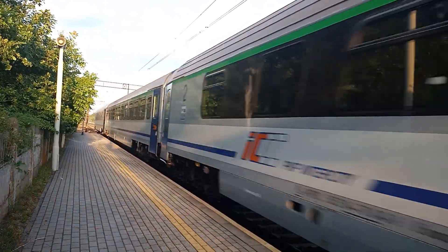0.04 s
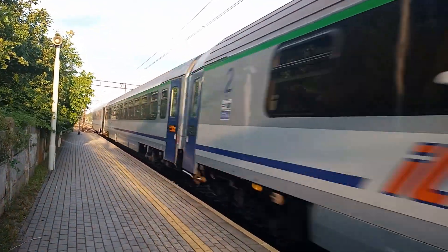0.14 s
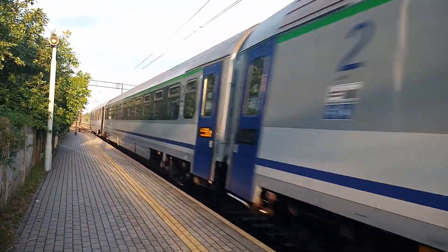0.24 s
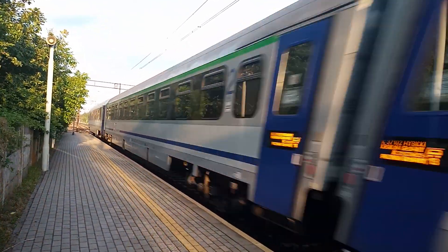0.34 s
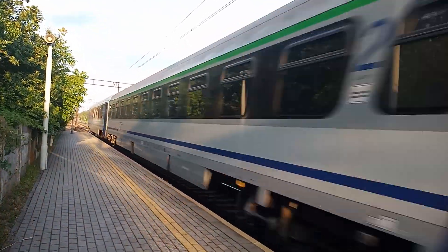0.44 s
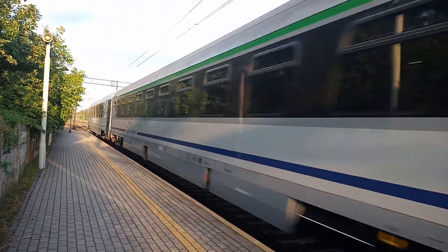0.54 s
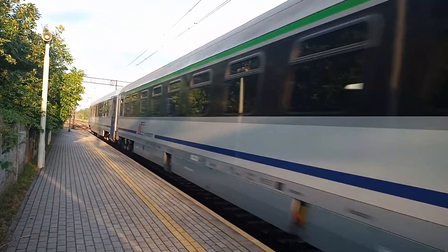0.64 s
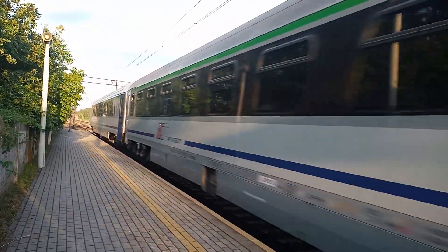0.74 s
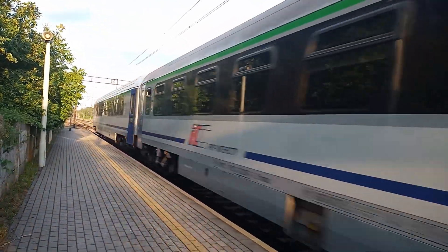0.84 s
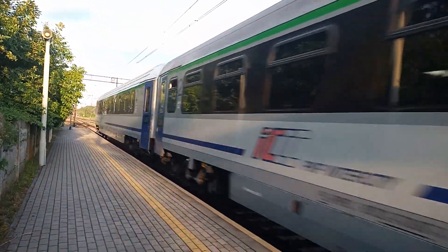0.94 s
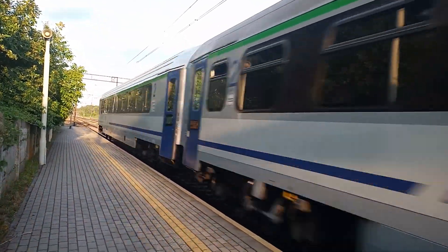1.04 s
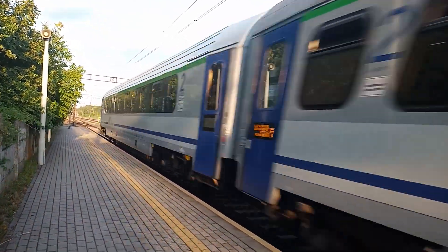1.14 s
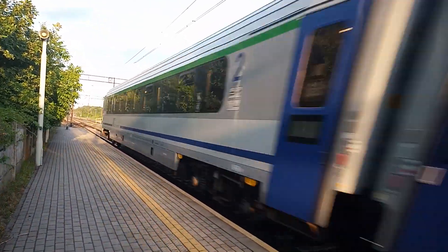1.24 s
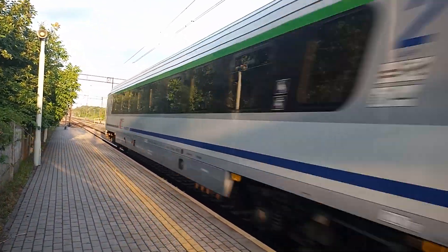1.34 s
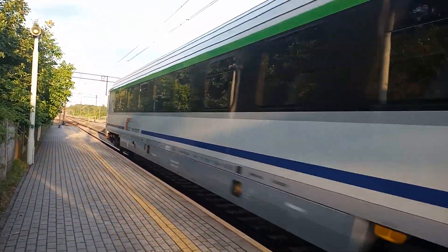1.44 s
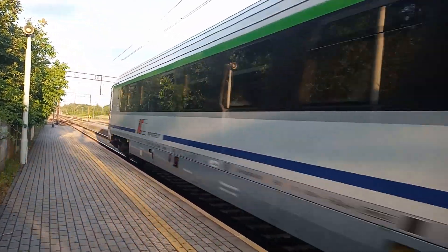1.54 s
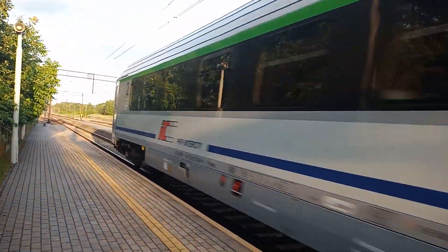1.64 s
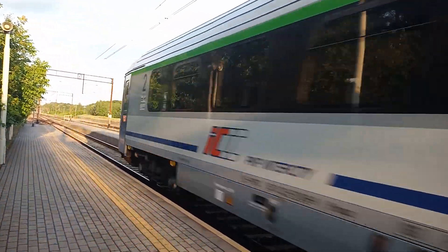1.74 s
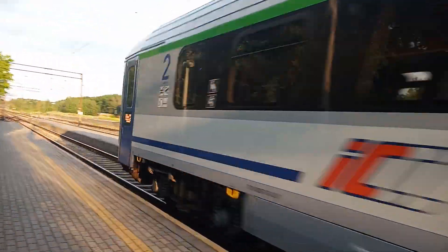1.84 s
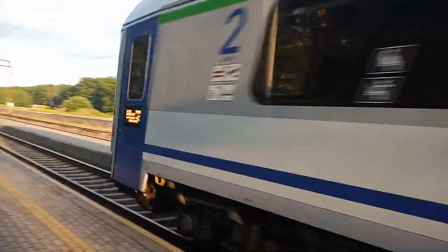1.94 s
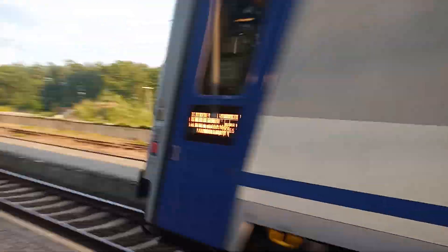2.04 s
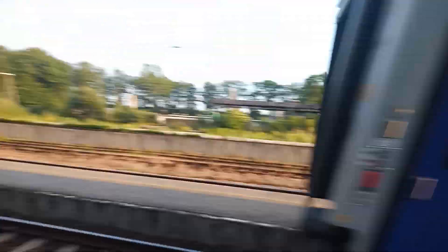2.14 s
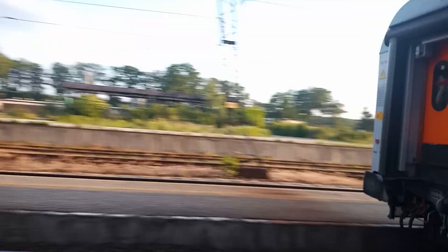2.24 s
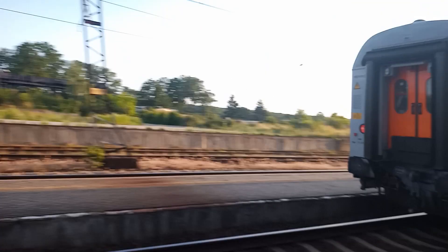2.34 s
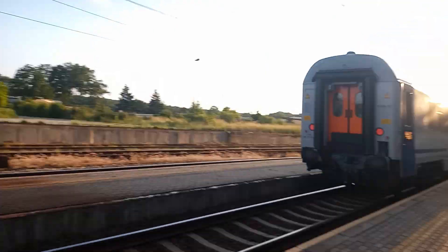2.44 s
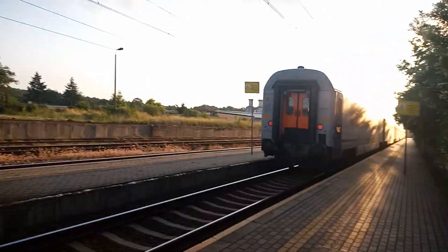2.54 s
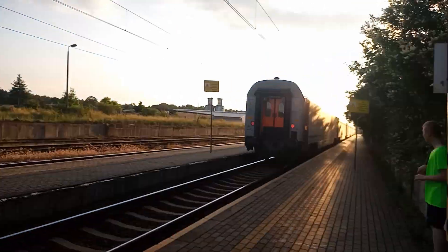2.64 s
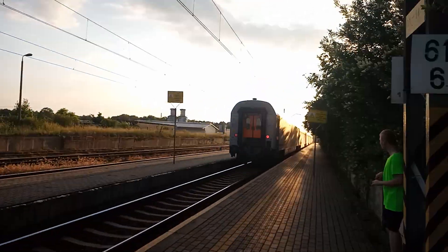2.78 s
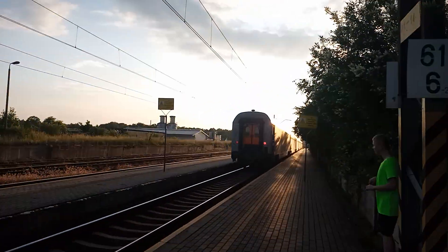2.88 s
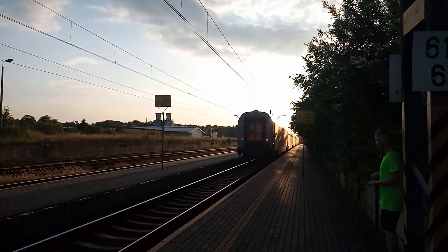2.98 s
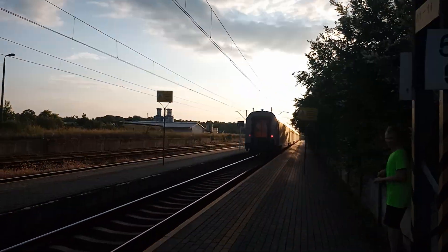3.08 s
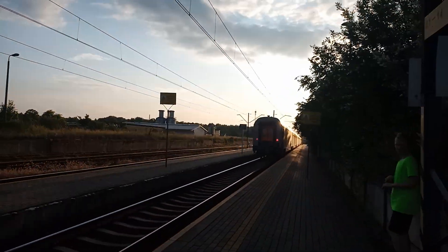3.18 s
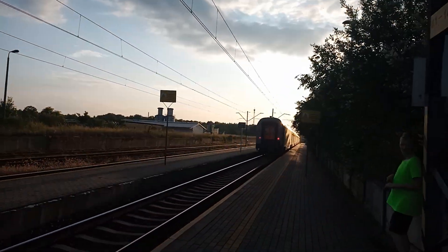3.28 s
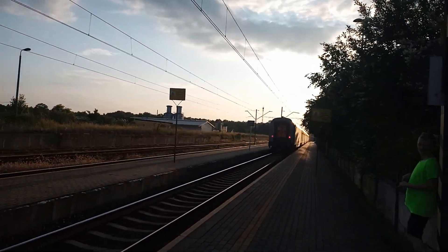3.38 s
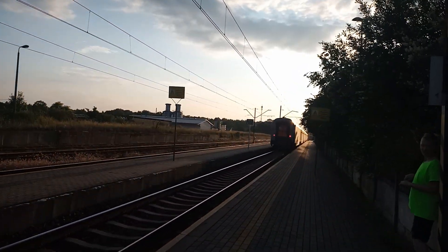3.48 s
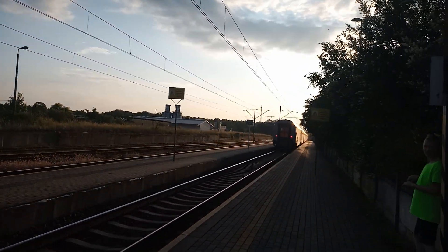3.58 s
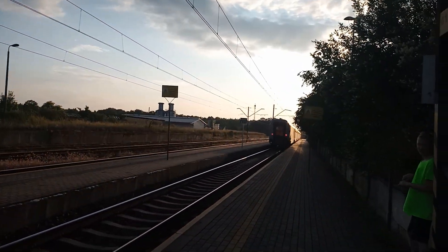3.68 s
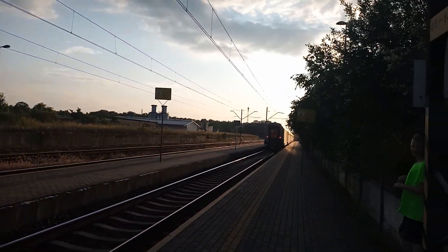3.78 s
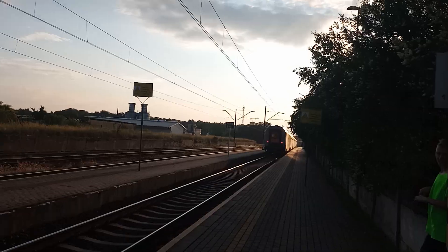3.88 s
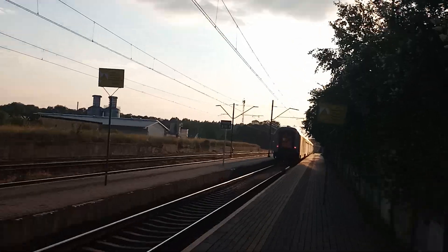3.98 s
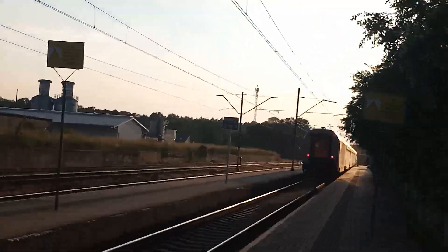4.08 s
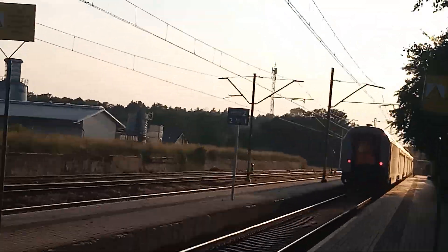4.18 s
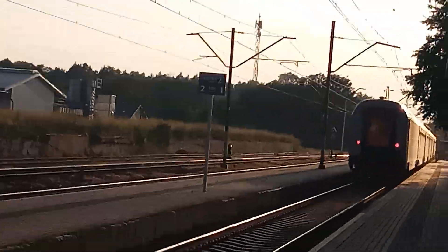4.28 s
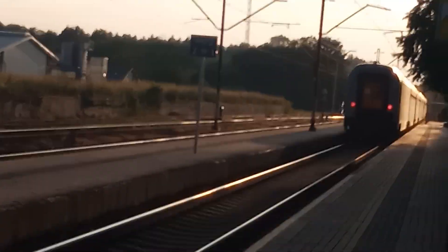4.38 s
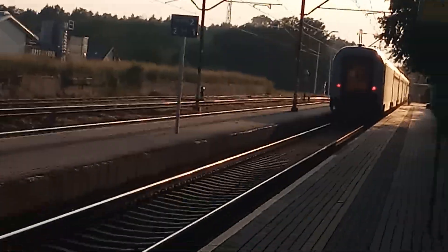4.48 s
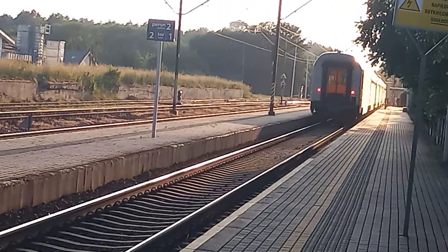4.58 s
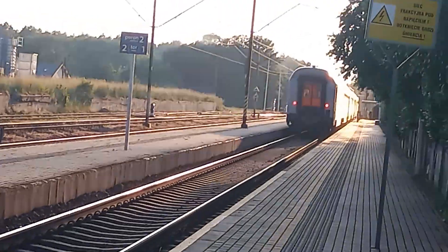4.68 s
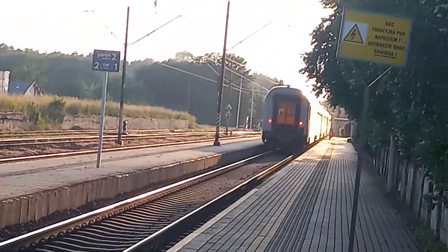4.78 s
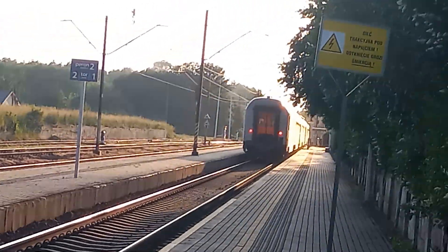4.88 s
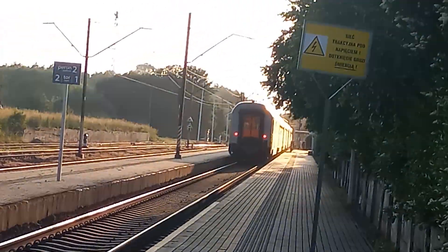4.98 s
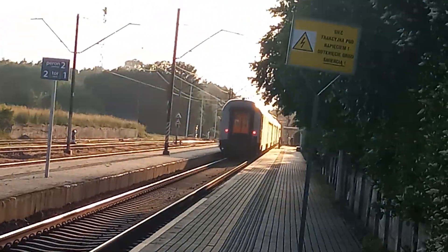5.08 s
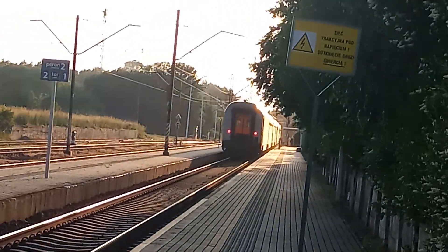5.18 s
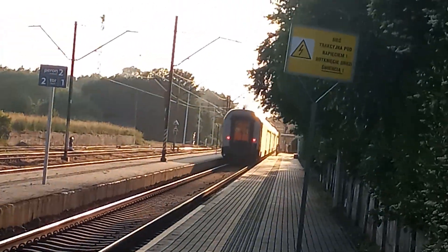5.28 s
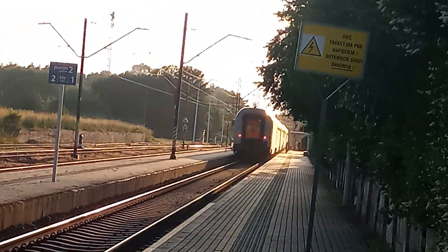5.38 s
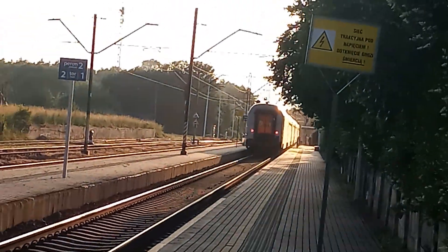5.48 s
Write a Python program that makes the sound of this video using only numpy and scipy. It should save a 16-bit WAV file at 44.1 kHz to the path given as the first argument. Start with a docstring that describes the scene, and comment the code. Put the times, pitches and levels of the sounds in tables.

```python
"""An express train rushes past

The last coaches of an electric train pass a phone on a platform and run away down the line.
Rough steel makes the rails roar and the wheels ring. Each bogie (a frame with two axles) drops in
pitch as it goes by, and a coach's fan hums past. The nearest bogies overload the microphone.
Then the rails sing, and the swirling air behind the train buffets the microphone."""
import sys
import numpy as np
from scipy import signal
from scipy.fft import rfft, irfft, next_fast_len
from scipy.io import wavfile
from scipy.ndimage import uniform_filter1d, map_coordinates

SR = 44100
rng = np.random.default_rng(int(sys.argv[2]) if len(sys.argv) > 2 else 0)


def to_wav(sig):
    """Store sig (one row per channel, or 1-D mono) as 16-bit WAV at the path in sys.argv[1].

    Samples outside -1..1 are clipped; the rate is SR.
    """
    pcm = np.clip(np.atleast_2d(sig), -1, 1) * 32767
    pcm = np.round(pcm).astype(np.int16)
    wavfile.write(sys.argv[1], SR, pcm.T)  # frames by channels


N = 243431
T = np.arange(N) / SR
SPEED_M_S, SOUND_M_S = 25, 343
TRACK_DISTANCE_M, AXLE_GAP_M = 3.6, 2.5
LOUDEST_LAG_S = 0.013  # a bogie is loudest just after it passes
FAR_STEEL_S = 1.53  # how slowly the distant ring and hiss take over

# The passing bogies. Each row: passing time in seconds, ring level in dB, how steeply the ring fades
# with distance, roar level in dB, hiss level in dB, squeal in dB compared with one axle's ring.
BOGIES = [(-.13, -14.5, 1.1, -14, -24, -20), (.37, -7.5, 2.35, -17, -20.5, -29),
          (.62, -18, 2.8, -18, -23, -18), (1.35, -18, 1.5, -29, -42, -17),
          (1.515, -8, 2.13, -17.5, -16.5, -14), (2.115, -6.5, 1.34, -15.5, -16, -11.5)]
# The notes a wheel rings at. Each row: pitch at rest in Hz, width in Hz, relative level in dB.
WHEEL_NOTES = [(940, 350, -7.5), (1160, 150, -5), (1442, 94, 2), (1534, 290, -3), (1730, 510, -6.5),
               (1990, 140, 0.5), (2150, 250, -10), (2600, 450, -8)]
# The squeal of a wheel's rim. Each row: pitch at rest in Hz, width in Hz, relative level in dB.
SQUEAL_NOTES = [(4606, 80, 2), (3620, 400, -4)]
# The rails' roar, close by and far away. Each row: frequency in Hz, relative level in dB.
ROAR_NEAR = [(200, -51), (340, -22.5), (440, -5.5), (580, -5.5), (720, 1.5), (830, 0), (960, 1.5),
             (1220, -8), (1600, -4), (2300, -6.5), (3000, -20), (4500, -31)]
ROAR_FAR = [(200, -72), (380, -16.5), (520, -9), (660, 2), (900, 3), (1200, -2), (1550, -2.5), (2100, -8),
            (2380, -3), (2900, -33), (4500, -26)]
# The hiss of wheel on rail, close by and far away. Each row: frequency in Hz, relative level in dB.
HISS_NEAR = [(1500, -16), (2500, 0.5), (3100, 1), (3800, 1.5), (4600, -0.5), (5400, -5.5), (6400, -13),
             (7800, -23), (9000, -25.5), (10500, -23.5), (13000, -27.5), (15500, -33.5)]
HISS_FAR = [(1500, -4), (2500, -0.5), (3100, -0.5), (4000, -4), (4800, -6), (5500, -7), (5950, -21),
            (7000, -11), (7600, -23.5), (9200, -28.5), (10300, -24), (13000, -26.5), (15500, -38)]
# The rumble of the coaches and track. Each row: frequency in Hz, relative level in dB.
RUMBLE = [(25, -40), (60, -27), (110, -19), (170, -11.5), (250, -1), (330, 0), (450, -7), (700, 0)]
# Thin tones that the rails carry back from the departing wheels.
# Each row: pitch in Hz, width in Hz, level in dB, middle of the swell in seconds, its width in seconds.
RAIL_TONES = [(575, 28, -32, 3.16, 0.36), (794, 41, -26.5, 3.46, 0.53), (1080, 46, -26, 4.26, 1.9),
              (1326, 26, -28, 3.84, 1.25), (1814, 47, -27, 4.2, 0.82), (3550, 170, -57, 2.3, .9),
              (4310, 300, -37, 3.33, 1.23), (5250, 160, -44.5, 3.6, 1.9), (6480, 230, -44, 2.8, 1.7),
              (8550, 330, -51.5, 3.3, .9), (10120, 280, -52, 5.16, 0.34), (10100, 810, -52, 4, .6),
              (11900, 300, -59, 4.1, 1.2)]
# The hum of a fan under the floor. Each row: pitch at rest in Hz, level in dB.
FAN_TONES = [(235, -38.5), (314, -29.5)]
# The rush from the fan's outlet. Each row: pitch at rest in Hz, width in Hz, relative level in dB.
OUTLET_NOTES = [(1426, 64, -1.5), (1590, 140, 1), (2220, 57, -4)]
# Wind on the microphone. Each row: frequency in Hz, relative level in dB.
WIND = [(25, -36), (60, -25), (120, -5), (220, 0.5), (340, 3.5), (480, -1), (700, -6), (1500, -35),
        (4000, -62)]
# Gusts behind the train. Each row: strongest moment in seconds, length in seconds, level in dB.
GUSTS = [(3.272, 0.028, -29), (3.824, 0.057, -35), (4.147, 0.026, -26.5), (4.404, 0.032, -32),
         (4.509, 0.03, -25.5), (4.595, 0.053, -29.5), (4.842, 0.011, -23.5), (4.88, .033, -18),
         (4.92, 0.057, -26.5), (5.079, 0.016, -21), (5.29, 0.017, -24.5), (5.377, 0.019, -16),
         (5.42, 0.019, -18.5), (5.495, 0.06, -22.5)]

LAST_BOGIE_S, FAN_PASSES_S = BOGIES[-1][0], 1.24


def wheels(throb_db=1.0, circumference_m=2.9):
    """Rough steel sets each axle ringing as it passes; the departing train rings on from afar."""
    far_gain = receding(-19.5, fade_db_per_s=1.96) * np.sqrt(gone(FAR_STEEL_S))
    total = far_gain * doppler(WHEEL_NOTES, LAST_BOGIE_S)
    for pass_s, ring_db, falloff, _, _, squeal_db in BOGIES:
        axle_gain = undb(ring_db) / np.sqrt(2)  # two axles share the power
        for side in (-.5, .5):
            axle_s = pass_s + side * AXLE_GAP_M / SPEED_M_S
            # an uneven wheel swells once a turn
            turns = sent_time(axle_s) * SPEED_M_S / circumference_m + rng.random()
            throb = undb(throb_db * np.sin(2 * np.pi * turns))
            total += axle_gain * throb * nearness(axle_s, falloff) * doppler(WHEEL_NOTES, axle_s)
        # a rubbing rim beams its squeal sideways, so it fades faster
        squeal = undb(squeal_db) * doppler(SQUEAL_NOTES, pass_s)
        total += axle_gain * nearness(pass_s, falloff + 1) * squeal
    return total


def rail_roar(loss_db_per_m=0.61, flutter_db=0.5, sleeper_db=0.84, sleeper_gap_m=0.63):
    """The roar dies away along the rails and flutters as axles cross the sleepers beneath them."""
    bogie_gains = [undb(roar_db - loss_db_per_m * SPEED_M_S * abs(T - pass_s - LOUDEST_LAG_S))
                   for pass_s, _, _, roar_db, _, _ in BOGIES]
    far_gain = receding(-16, fade_db_per_s=2.41) * np.sqrt(gone(within_s=0.39))
    roar = together(*bogie_gains) * noise(ROAR_NEAR) + far_gain * noise(ROAR_FAR)
    sleepers = np.sin(2 * np.pi * (T * SPEED_M_S / sleeper_gap_m + 0.33 * wander(8)))
    return roar * undb(flutter_db * wander(30) + sleeper_db * sleepers)


def steel_hiss(treble_hz=7200, all_round_db=-8.5, beam_db=-4.5, air_db=-21.5):
    """Steel on steel hisses at each bogie; rushing air and sizzling rails add to the treble."""
    far_share = gone(FAR_STEEL_S)
    hiss = np.sqrt(1 - far_share) * noise(HISS_NEAR) + np.sqrt(far_share) * noise(HISS_FAR)
    hiss *= flicker(db=0.75, rate_hz=40)
    treble = signal.sosfiltfilt(signal.butter(4, treble_hz, "high", fs=SR, output="sos"), hiss)
    swells = [undb(db) * nearness(pass_s, falloff=1.45) for pass_s, *_, db, _ in BOGIES]
    gain = together(receding(-24, fade_db_per_s=2.75), *swells)
    # some treble spreads all round, and some is beamed sideways from each bogie
    beams = [undb(db + beam_db) * nearness(pass_s, falloff=2.3) for pass_s, *_, db, _ in BOGIES]
    air = undb(air_db) * swell(centre_s=0.92, width_s=0.63)
    sizzle = receding(-12, fade_db_per_s=8.5) * gone(within_s=.95) * flicker(db=0.8, rate_hz=24)
    treble_gain = together(gain * undb(all_round_db), air, sizzle, *beams)
    return (hiss - treble) * gain + treble * treble_gain * flicker(db=1.7, rate_hz=12)


def coach_rumble(shake_db=-31.5, drone_db=-30):
    """Each bogie shakes the track and the coaches; the coach with the fan drones loudest."""
    shakes = [undb(ring_db + shake_db) * nearness(pass_s, falloff=1.6) for pass_s, ring_db, *_ in BOGIES]
    drone = undb(drone_db) * swell(FAN_PASSES_S, width_s=0.53)
    gain = together(receding(-41.5, fade_db_per_s=0.62), drone, *shakes)
    return noise(RUMBLE) * gain * flicker(db=3.2, rate_hz=11)


def singing_rails(start_s=3.04, rise_s=0.045):
    """The rails carry thin tones back from the train; each swells and fades in its own time."""
    total = 0
    for hz, width_hz, db, centre_s, width_s in RAIL_TONES:
        tone = ringing([(hz, width_hz, 0)], size=next_fast_len(N))[:N]
        total += tone * undb(db) * flicker(db=0.9, rate_hz=7) * swell(centre_s, width_s)
    fade_in = (1 + np.tanh((T - start_s) / rise_s)) / 2
    return total * fade_in


def fan(waver_cycles=0.032, rush_db=-20.0, lead_s=0.12):
    """A fan under a coach makes two wavering tones and a rush of air, loudest when it is close."""
    hum = 0
    for hz, db in FAN_TONES:
        cycles = hz * sent_time(FAN_PASSES_S) + waver_cycles * wander(26.3)
        hum += undb(db) * np.sqrt(2) * np.sin(2 * np.pi * cycles)
    rush = undb(rush_db) * doppler(OUTLET_NOTES, FAN_PASSES_S)
    # the outlet points forward, so it is loudest just before it passes
    closeness = TRACK_DISTANCE_M / distance_m(FAN_PASSES_S - lead_s)
    return hum * closeness ** 2 + rush * closeness ** 0.64


def wake(after_one_second_db=-68.5, growth=2.7):
    """Swirling air behind the train hits the microphone: a growing low flutter with short thumps."""
    flutter = undb(after_one_second_db) * seconds_behind() ** growth * flicker(db=8, rate_hz=7.8)
    gusts = [undb(db) * swell(centre_s, length_s / 2) for centre_s, length_s, db in GUSTS]
    return together(flutter, *gusts) * noise(WIND) * flicker(db=1, rate_hz=120)


def distance_m(pass_s):
    """How far away a point on the train is, if it passes the phone at pass_s."""
    return np.hypot(TRACK_DISTANCE_M, SPEED_M_S * (T - pass_s))


def sent_time(pass_s):
    """When the sound heard now left that point on the train."""
    return T - distance_m(pass_s) / SOUND_M_S


def doppler(notes, pass_s):
    """Ringing from a moving point: higher as it comes, lower as it goes (the Doppler effect)."""
    sent = sent_time(pass_s)
    positions = (sent - sent[0]) * SR
    at_rest = ringing(notes, size=next_fast_len(N + N // 4))
    return map_coordinates(at_rest, [positions], order=2, mode="wrap")


def nearness(pass_s, falloff):
    """Gain of a passing point, 1 at its loudest; a bigger falloff makes a shorter swell."""
    return (TRACK_DISTANCE_M / distance_m(pass_s + LOUDEST_LAG_S)) ** falloff


def seconds_behind():
    """Time since the last bogie was at its loudest; 0 before that."""
    return np.maximum(T - LAST_BOGIE_S - LOUDEST_LAG_S, 0)


def gone(within_s):
    """Rises from 0 to 1 as the train leaves."""
    return 1 - np.exp(-(seconds_behind() / within_s) ** 2)


def receding(db, fade_db_per_s):
    """A gain that holds while the train is alongside, then fades evenly."""
    return undb(db - fade_db_per_s * seconds_behind())


def ringing(notes, size):
    """Noise shaped into ringing notes, as when roughness keeps shaking steel."""
    freqs = np.maximum(np.fft.rfftfreq(size, 1 / SR), 1)
    power = 0
    for hz, width_hz, db in notes:
        peak = undb(db) ** 2 / (1 + ((freqs - hz) / width_hz) ** 2) ** 3
        power += peak * np.minimum(freqs / hz, 1) ** 2  # steel gives off little sound below its notes
    return unit(irfft(rfft(rng.standard_normal(size)) * np.sqrt(power), size))


def noise(points):
    """Noise whose tone follows a curve of (Hz, dB) points and falls away past both ends."""
    hz, db = np.transpose(points)
    freqs = np.maximum(np.fft.rfftfreq(N, 1 / SR), 1)
    gain = undb(np.interp(np.log(freqs), np.log(hz), db))
    edges = np.minimum(freqs / hz[0], 1) ** 2 * np.minimum(hz[-1] / freqs, 1) ** 2
    return unit(irfft(rfft(rng.standard_normal(N)) * gain * edges, N))


def wander(rate_hz):
    """A smooth random curve of typical size 1 that picks rate_hz new values a second."""
    hold = max(int(SR / rate_hz), 2)
    steps = np.repeat(rng.standard_normal(N // hold + 2), hold)
    return unit(uniform_filter1d(uniform_filter1d(steps, hold), hold)[:N])


def flicker(db, rate_hz):
    """A gain that drifts up and down at random by about db decibels."""
    return undb(db * wander(rate_hz))


def swell(centre_s, width_s):
    """A smooth rise from 0 to 1 and back."""
    return np.exp(-.5 * ((T - centre_s) / width_s) ** 2)


def together(*gains):
    """The joint gain of unrelated sounds: their powers add up."""
    return np.sqrt(sum(gain ** 2 for gain in gains))


def undb(db):
    """Turn decibels into a gain, the number a sound is multiplied by."""
    return 10 ** (np.asarray(db) / 20)


def unit(x):
    """Scale a signal to an average strength (rms) of 1."""
    return x / np.sqrt(np.mean(x ** 2))


def scene():
    """The passing train, the singing rails and the wake, added into one channel."""
    train = wheels() + rail_roar() + steel_hiss() + coach_rumble() + fan()
    return (train + singing_rails() + wake())[None]


def record(dry, ceiling=0.99, low_cut_hz=60, high_cut_hz=15700):
    """The phone clips the loudest peaks, thins the deep bass and cuts the highest treble."""
    clipped = np.clip(dry, -ceiling, ceiling)
    thinned = signal.sosfilt(signal.butter(1, low_cut_hz, "high", fs=SR, output="sos"), clipped)
    return signal.sosfilt(signal.ellip(10, .2, 70, high_cut_hz, fs=SR, output="sos"), thinned)


dry = scene()
out = record(dry)
to_wav(out)
```